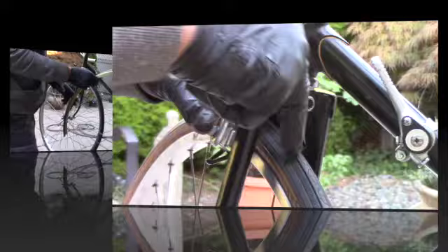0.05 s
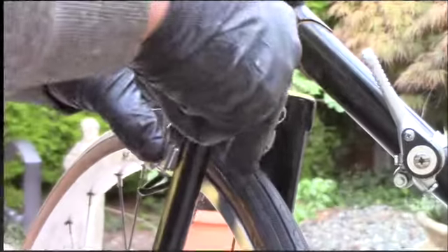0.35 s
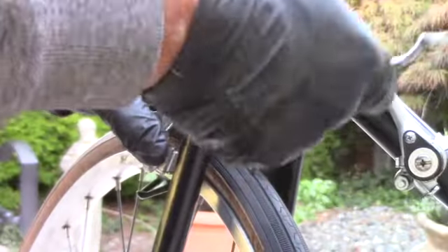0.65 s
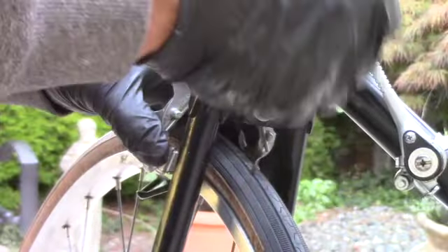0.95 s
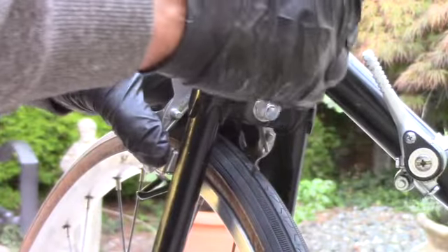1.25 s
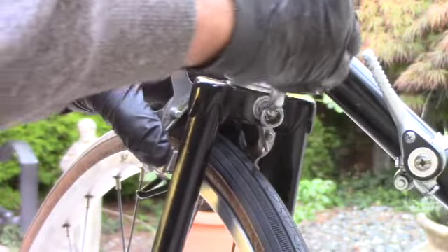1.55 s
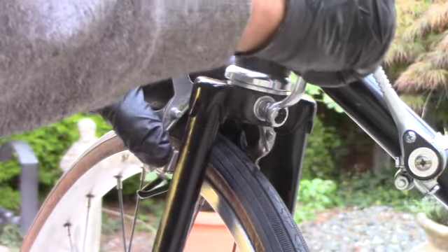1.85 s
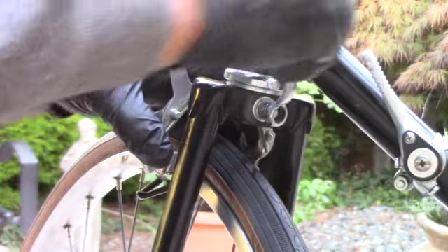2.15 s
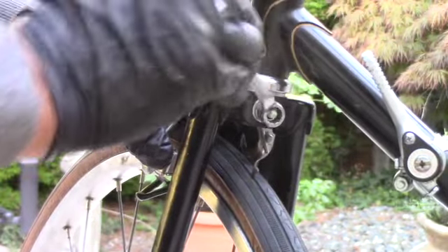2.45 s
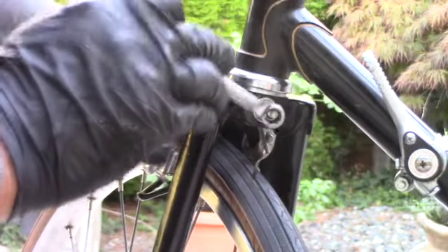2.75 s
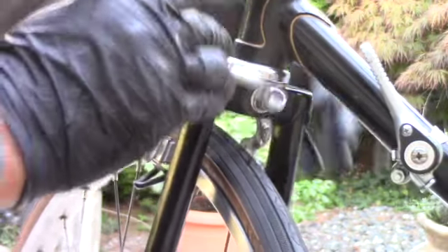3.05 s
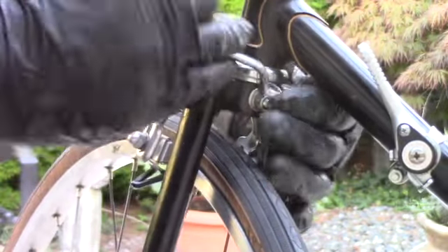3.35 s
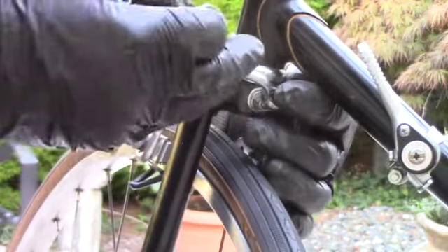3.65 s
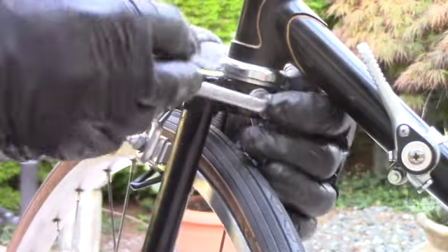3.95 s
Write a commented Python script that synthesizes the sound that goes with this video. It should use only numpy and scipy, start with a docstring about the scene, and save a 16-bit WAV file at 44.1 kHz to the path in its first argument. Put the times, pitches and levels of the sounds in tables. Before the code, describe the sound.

Irregular metallic clicks of a wrench on a bicycle brake, with distant traffic behind.

```python
"""A small steel wrench works on a bicycle's front brake, close by, in a garden with steady far traffic.
First it knocks the frame, then the fork; each contact is a dry crack plus the ring of one metal part,
and the yard echoes faintly. A glove and sleeve brush past now and then. After about a second come
scattered clicks on the pivot, bracket and fork crown. Near three seconds the clicks crowd together on
the nut, brake arm, bracket and the wrench itself, and the loudest hits the arm just before the end."""
import sys
import numpy as np
from scipy import signal
from scipy.fft import rfft, irfft, next_fast_len
from scipy.io import wavfile
from scipy.ndimage import map_coordinates

SR = 44100
rng = np.random.default_rng(int(sys.argv[2]) if len(sys.argv) > 2 else 0)


def dump_mix(stems):
    """Bounce the given channels to the path in sys.argv[1] as a 16-bit WAV at rate SR."""
    frames = np.atleast_2d(stems).T  # one column per channel
    limited = np.clip(frames, -1, 1)  # hard clip at full scale
    pcm = np.round(limited * 32767).astype(np.int16)
    wavfile.write(sys.argv[1], SR, pcm)


N = 176400

# Each touch of the wrench: start_s, thud_db, clack_db, crack_db, fizz_db, part_name, ring_db
CONTACTS = [ (.002, -37, -42.5, -49.5, -64, "frame", -37), (.0135, -53, -41, -45, -53, "frame", -36),
            (.019, -37.5, -43.5, -55, -53, "frame", -30.5), (.025, -55, -37.5, -43, -48.5, "frame", -42),
            (.132, -46.5, -61, -69, -77, "arm", -57), (.187, -70, -54, -56.5, -78, "arm", -56),
            (.3905, -72, -47, -51, -66, "wrench", -57), (.3985, -35.5, -29.5, -38, -54, "fork", -35.5),
            (.404, -36, -60, -38, -58, "fork", -32.5), (.409, -55, -36, -42, -52, "fork", -36),
            (1.2036, -44, -32.5, -41.5, -56, "pivot", -36.5), (1.238, -53, -49, -62, -72, "pivot", -56),
            (1.318, -68, -38.5, -36, -40, "wrench", -27), (1.362, -49, -47.5, -56, -68, "pivot", -56),
            (1.4151, -52, -49, -48, -67, "pivot", -47), (1.448, -63, -52, -62, -75, "bracket", -54),
            (1.4627, -39.5, -36.5, -39.5, -54, "bracket", -37), (1.601, -53, -54, -61, -82, "bracket", -58),
            (1.7415, -54, -46, -49, -67, "crown", -49), (1.7472, -42, -36.5, -34.5, -47, "crown", -30.5),
            (1.754, -42.5, -51, -56, -63, "crown", -38), (1.777, -57, -52, -64, -70, "crown", -49),
            (1.911, -46.5, -42.5, -39.5, -58, "arm", -40), (2.255, -52, -54, -65, -75, "bracket", -53),
            (2.567, -60, -42, -44, -61, "nut", -42.5), (2.736, -43, -43.5, -42, -54, "wrench", -47),
            (2.740, -43, -37.5, -65, -64, "bracket", -57), (2.921, -48, -57, -64, -76, "bracket", -65),
            (2.959, -54, -58, -59, -72, "bracket", -48), (2.967, -43.5, -39, -44, -64, "bracket", -40),
            (2.999, -40.5, -55, -59, -70, "bracket", -62), (3.007, -39.5, -36, -39, -59, "arm", -33.5),
            (3.0611, -40.5, -31.5, -28, -35.5, "arm", -23), (3.1, -49, -49, -57, -60, "arm", -49),
            (3.152, -38, -41.5, -47.5, -66, "nut", -46), (3.2063, -41, -34, -29, -34.5, "wrench", -23.5),
            (3.278, -49, -42, -50, -67, "wrench", -46), (3.364, -53, -36.5, -49, -65, "nut", -63),
            (3.388, -47, -42, -42.5, -62, "bracket", -54), (3.392, -43, -32.5, -47, -60, "bracket", -34.5),
            (3.42, -61, -56, -76, -78, "bracket", -51), (3.4357, -42.5, -33.5, -32.5, -46, "nut", -32),
            (3.499, -69, -54, -53, -77, "bracket", -50.5), (3.583, -51, -51, -53.5, -75, "nut", -49.5),
            (3.8259, -41.5, -37, -44, -51, "bracket", -43), (3.8276, -38.5, -57, -28, -26, "arm", -21),
            (3.8311, -30.5, -23, -19, -34, "arm", -17), (3.877, -38, -50, -38.5, -56, "bracket", -30),
            (3.8798, -34.5, -32, -36.5, -51, "bracket", -33), ]
# The four bands of a crack (thud, clack, crack, fizz): low_hz, high_hz
CRACK_BANDS = [(400, 1800), (1750, 4050), (5100, 9880), (10500, 13800)]
# How long each band takes to fade by 60 dB (every fade_s below means the same): fade_s
CRACK_FADES_S = [0.073, 0.038, 0.038, 0.028]
# The tones that each metal part rings with: pitch_hz, level_db, fade_s
PART_TONES = { "arm": [(2890, -11, .06), (3270, -9, .06), (3790, -15, .05), (5840, -14, .05),
              (7035, 0, .042), (7170, -5, .03), (7420, -13, .045), (8540, -11, .03), (11280, -12, .035),
              (14080, -24, .045)], "wrench": [(3400, -12, .04), (4813, -21, .09), (5300, -12, .04),
              (5440, -16, .05), (7080, -2, .033), (7434, -12, .04), (8530, 0, .028), (8800, -11, .025),
              (11200, -19, .04), (11890, -21, .05), (14130, -23, .055)], "nut": [(1810, 0, .07),
              (1900, -4, .1), (2025, -6, .08), (3470, -2, .06), (5700, -9, .05), (12600, -12, .04),
              (13430, -6, .04), (15500, -18, .03)], "bracket": [(1895, -1, .06), (2364, -3, .06),
              (2690, -5, .04), (2888, -3, .045), (3090, 0, .04), (3560, -7, .04), (5350, -9, .04)],
              "fork": [(540, -14, .08), (800, -12, .06), (935, 0, .085), (1150, -13, .05), (2700, -13, .04),
              (4660, -18, .22)], "crown": [(545, -12, .08), (720, -9, .07), (920, 0, .08), (1140, -13, .05),
              (3940, -8, .05), (4050, -12, .05), (4280, -19, .17)], "pivot": [(1900, -3, .05),
              (3080, -3, .08), (3300, 0, .08), (3550, -2, .07), (4080, -1, .09), (4800, -5, .09),
              (5250, -5, .06)], "frame": [(194, -14, 0.13), (294, -10.5, 0.062), (1138, -2, .06),
              (1250, -10, 0.031), (1380, 4.5, 0.028), (1560, 0, 0.027), (1864, -1.5, 0.049)], }
# Broad resonances of brake and fork that colour every crack: pitch_hz, width_hz, level_db
BODY_RESONANCES = [(313, 180, 2.5), (756, 740, 0), (993, 560, 6), (1770, 290, -0.5), (2368, 640, 0.5),
                   (2890, 550, 1.5), (3740, 1050, 0), (4470, 250, 1.5), (5190, 490, 10), (5670, 1000, -5),
                   (7200, 1500, 3), (8420, 390, 0), (9660, 170, -7.5), (11230, 190, -9.5),
                   (13200, 600, -19), (14100, 370, -4)]
# Each brush of glove and sleeve: peak_s, half_width_s, level_db
BRUSHES = [(.08, .06, -64.5), (0.822, 0.0078, -53.5), (.85, 0.065, -66), (1.28, 0.036, -62.5),
           (2.82, 0.041, -56), (2.95, .03, -62), (3.32, 0.13, -60.5), (3.47, 0.014, -55), (3.76, .03, -63)]
# The tone colour of rubbing cloth: pitch_hz, level_db
CLOTH_SPECTRUM = [(300, -15), (1500, -3), (3000, -2), (6000, -2), (10000, -7.5), (13000, -16), (16000, -27)]
# How long the yard's echo lasts, from low to high: pitch_hz, fade_s
YARD_FADES = [(300, 0.37), (2000, 0.31), (7000, 0.19), (14000, 0.14)]
# The tone colour of far traffic: pitch_hz, level_db
TRAFFIC_SPECTRUM = [(25, -26), (50, -24.5), (80, -9.5), (120, -9.5), (185, -3), (300, -5), (450, -4),
                    (700, -2.2), (920, -2.2), (1150, -7.5), (1450, -13), (2100, -20.5), (3200, -25),
                    (5300, -28.5), (10000, -36), (16000, -46.5)]
# The traffic's stereo width, as its side signal against its middle: pitch_hz, side_db
TRAFFIC_WIDTH = [(25, -4), (70, -20), (350, -16), (900, -25), (2500, -16.5), (6000, -41), (15000, -44)]


def wrench_contacts():
    """Every contact of the wrench cracks, rings one part and echoes in the yard."""
    out = np.zeros((2, N + SR))
    t = np.arange(SR // 3) / SR
    colour = body_colour(t)
    for start_s, *levels_db, part, ring_db in CONTACTS:
        click = crack(t, levels_db, colour)
        tone = ring(t, PART_TONES[part], ring_db)
        echo = yard_echo(click + amp(-5) * tone)  # rings reach the yard more weakly than cracks
        start = round(start_s * SR)
        out[:, start:start + len(t)] += click + tone + echo
    return out[:, :N]


def crack(t, levels_db, colour, snap_s=0.00045, snap_gain=3, chatter_s=0.0019):
    """A blow shakes the whole brake and fork: four bands of noise that die quickly."""
    snap = 1 + snap_gain * np.exp(-t / snap_s)
    fading_s = np.maximum(t - chatter_s, 0)  # the steel chatters on the part before the fade begins
    out = np.zeros(len(t))
    for edges_hz, fade_s, level_db in zip(CRACK_BANDS, CRACK_FADES_S, levels_db):
        band = signal.butter(3, edges_hz, "bandpass", fs=SR, output="sos")
        burst = rng.standard_normal(len(t)) * snap * amp(-60 * fading_s / fade_s)
        coloured = irfft(rfft(burst) * colour, len(t))
        out += amp(level_db) * unit_onset(signal.sosfilt(band, coloured))
    return out


def body_colour(t):
    """Brake and fork favour some pitches: their frequency response, for a sound as long as t."""
    hz = np.fft.rfftfreq(len(t), 1 / SR)
    return sum(amp(level_db) * 1j * hz * width_hz / (pitch_hz ** 2 - hz ** 2 + 1j * hz * width_hz)
               for pitch_hz, width_hz, level_db in BODY_RESONANCES)


def ring(t, tones, level_db, scatter_db=2, rise_s=0.00057, free_ring_db=-30, blur_cycles=0.9):
    """A struck part rings with its own tones, in a slightly different mix at every blow."""
    pitch_hz, tone_db, fade_s = np.transpose(tones)[:, :, None]
    # A light touch stays pressed on the part and damps it: 50 dB below a free ring, half as long.
    fade_s = fade_s * 2 ** (min(level_db - free_ring_db, 0) / 50)
    gains = amp(tone_db + scatter_db * rng.standard_normal(pitch_hz.shape))
    blur_hz = blur_cycles / fade_s  # the touching tool smears each tone's pitch
    random_walk = np.cumsum(rng.standard_normal((len(pitch_hz), len(t))), axis=1)
    drift = random_walk * np.sqrt(2 * np.pi * blur_hz / SR)
    phase = 2 * np.pi * (pitch_hz * t + rng.random(pitch_hz.shape)) + drift
    waves = gains * np.sin(phase) * amp(-60 * t / fade_s)
    rise = 1 - np.exp(-t / rise_s)
    return amp(level_db) * unit_onset(waves.sum(0) * rise)


def glove_brushes(rough_db=2.0):
    """Glove and sleeve rub past in soft, grainy swells of noise."""
    t = np.arange(N) / SR
    swells = sum(amp(level_db) * np.exp(-0.5 * ((t - peak_s) / half_width_s) ** 2)
                 for peak_s, half_width_s, level_db in BRUSHES)
    rubbing = noise(CLOTH_SPECTRUM) * amp(rough_db * wobble(250))
    return swells * unit_level(rubbing)


def yard_echo(sound, level_db=-13, side_db=-24, rise_s=0.002):
    """Ground, walls and bushes send back a faint stereo echo whose treble dies first."""
    hz, frame_s, spectra = signal.stft(rng.standard_normal((2, len(sound))), SR, nperseg=256)
    fade = amp(-60 * frame_s / value_at(YARD_FADES, hz)[:, None])
    tails = signal.istft(spectra * fade, SR, nperseg=256)[1]
    t = np.arange(tails.shape[1]) / SR
    tails *= 1 - np.exp(-(t / rise_s) ** 2)
    tails /= np.linalg.norm(tails[0])
    mid, side = signal.fftconvolve(sound[None], tails, axes=1)[:, :len(sound)]
    return amp(level_db) * (mid + amp(side_db) * np.array([side, -side]))


def far_traffic(level_db=-48, sway_db=0.86, lean_left_db=0.3):
    """Distant traffic makes a steady, gently swaying rush, nearly the same in both ears."""
    mid = noise(TRAFFIC_SPECTRUM)
    side = filtered(noise(TRAFFIC_SPECTRUM), lambda hz: amp(value_at(TRAFFIC_WIDTH, hz)))
    gain = amp(level_db - sway_db * wobble(2.23))
    balance = amp([[lean_left_db], [-lean_left_db]])
    return gain * np.array([mid + side, mid - side]) * balance


def amp(db):
    """Turn decibels into a gain to multiply by."""
    return 10 ** (np.asarray(db) / 20)


def unit_level(sound):
    """Scale a sound to an average (rms) level of 1."""
    return sound / np.sqrt(np.mean(sound ** 2) + 1e-20)


def unit_onset(blow):
    """Scale a blow so that its first 5 ms have an average (rms) level of 1."""
    return blow / np.sqrt(np.mean(blow[:SR // 200] ** 2) + 1e-20)


def value_at(table, hz):
    """Read between the rows of a (pitch_hz, value) table, on a logarithmic pitch scale."""
    pitches_hz, values = np.transpose(table)
    return np.interp(np.log(hz + 1), np.log(pitches_hz + 1), values)


def filtered(sound, gain_at):
    """Turn each frequency of a sound up or down by gain_at(hz)."""
    size = next_fast_len(N + SR // 2)
    hz = np.fft.rfftfreq(size, 1 / SR)
    return irfft(rfft(sound, size) * gain_at(hz), size)[..., :N]


def noise(spectrum):
    """Noise with the given tone colour and an average level of 1."""
    return unit_level(filtered(rng.standard_normal(N), lambda hz: amp(value_at(spectrum, hz))))


def wobble(points_per_s):
    """A smooth curve through evenly spaced random values."""
    points = rng.standard_normal(int(N * points_per_s / SR) + 4)
    return map_coordinates(points, [np.arange(N) * points_per_s / SR])


def scene():
    """The work on the brake over the garden's background."""
    return wrench_contacts() + glove_brushes() + far_traffic()


def record(dry, top_hz=15900):
    """Cut away the highest treble, steeply, above top_hz."""
    return filtered(dry, lambda hz: 1 / (1 + (hz / top_hz) ** 120))


dry = scene()
out = record(dry)
dump_mix(out)
```